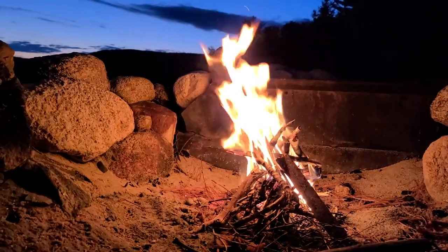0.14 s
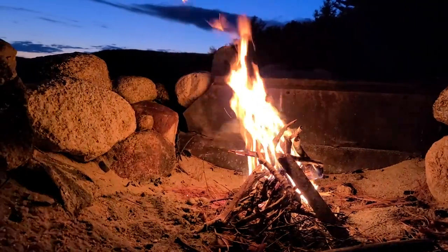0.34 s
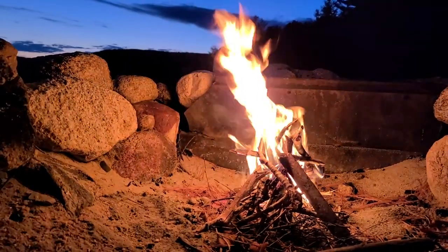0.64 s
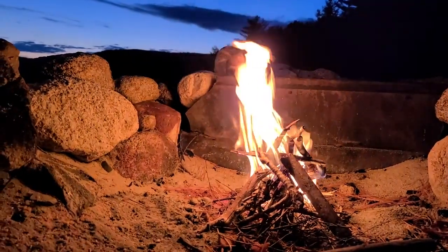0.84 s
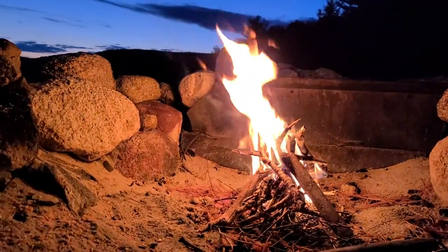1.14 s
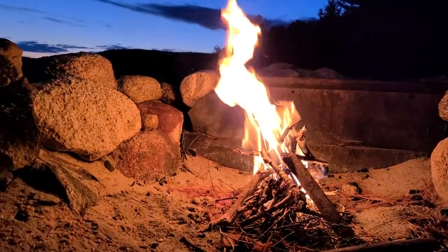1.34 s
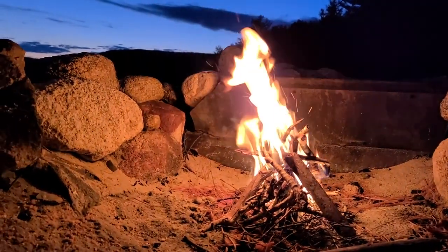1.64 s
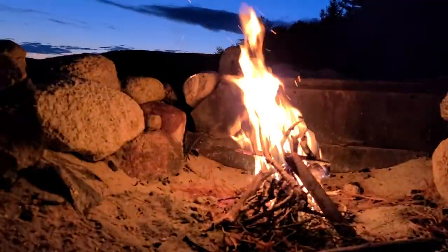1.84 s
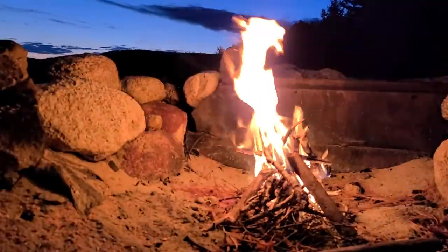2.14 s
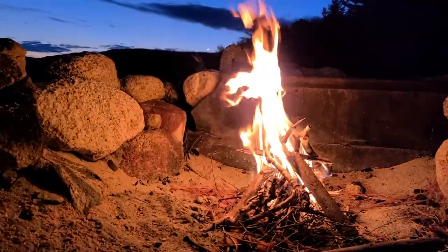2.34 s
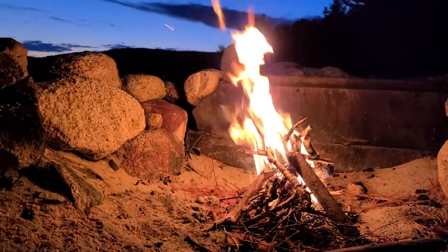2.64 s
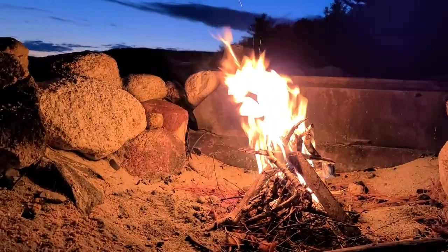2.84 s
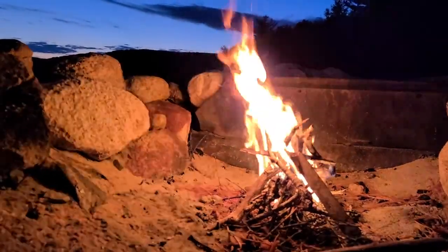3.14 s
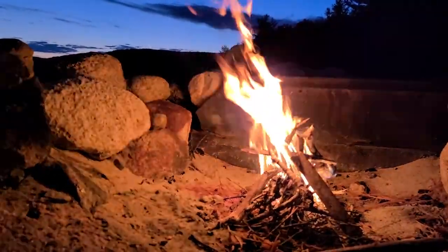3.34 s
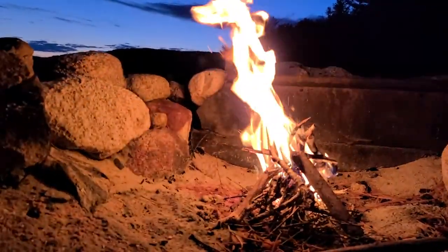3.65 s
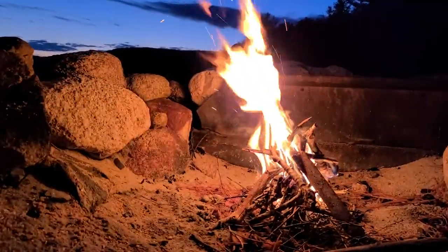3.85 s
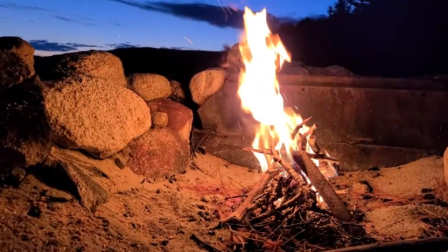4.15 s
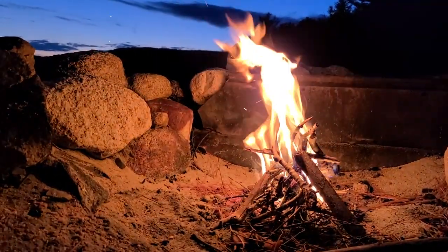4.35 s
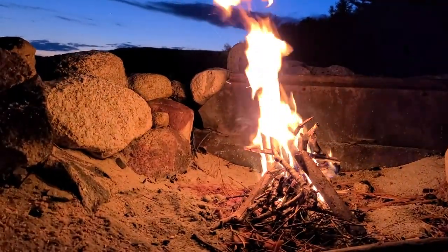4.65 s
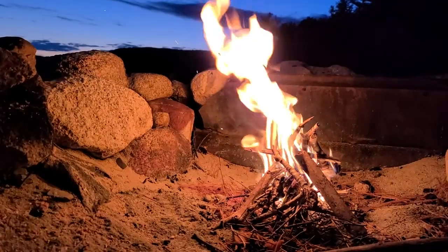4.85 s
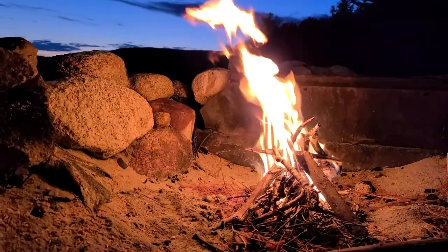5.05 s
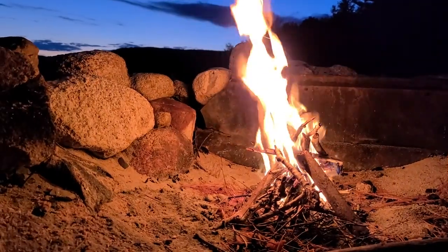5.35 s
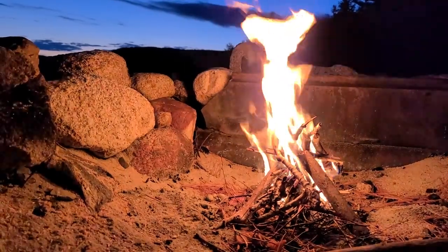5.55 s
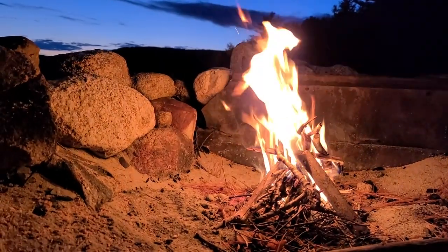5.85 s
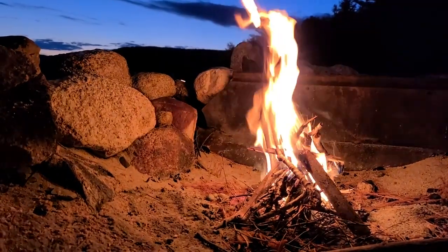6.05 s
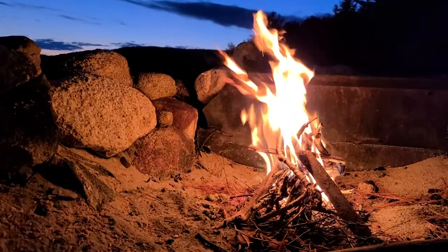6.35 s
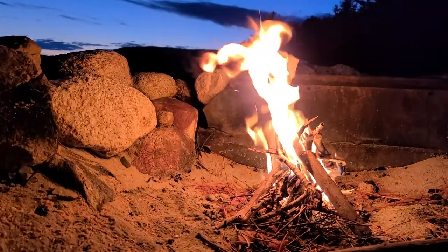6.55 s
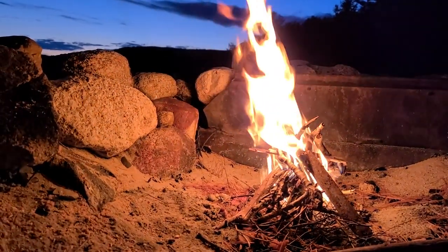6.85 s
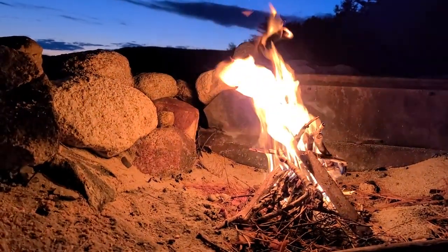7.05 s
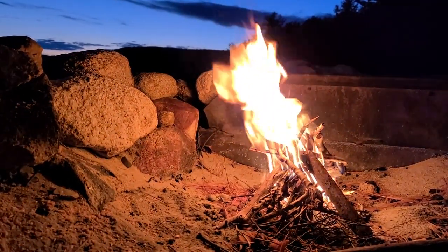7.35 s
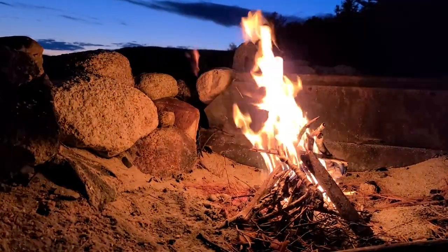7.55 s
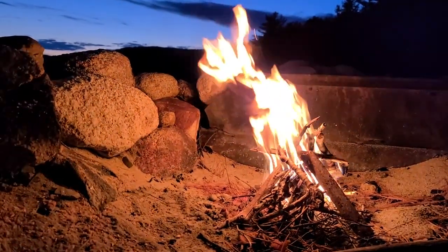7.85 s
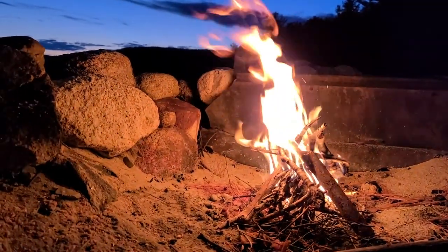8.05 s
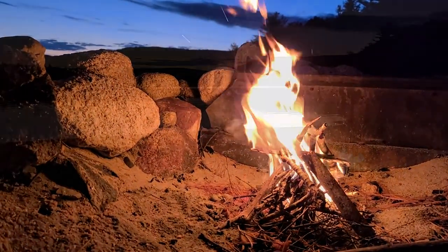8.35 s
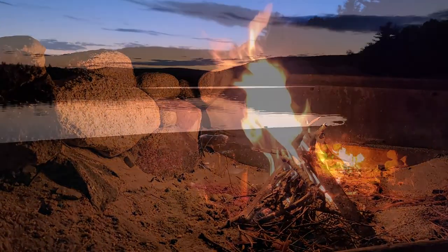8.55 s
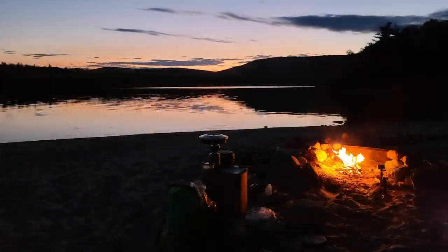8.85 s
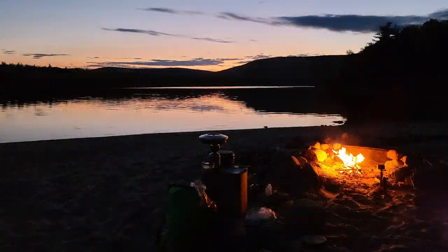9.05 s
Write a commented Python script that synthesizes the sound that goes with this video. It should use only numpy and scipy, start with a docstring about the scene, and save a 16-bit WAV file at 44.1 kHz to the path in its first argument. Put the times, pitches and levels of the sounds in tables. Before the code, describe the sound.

A small stick fire crackles close to the microphone, with sharp pops, a faint hiss and a soft low flutter of flame. Across a still lake a loon repeats short, wavering tremolo calls that echo off the far shores. About halfway through, a second, higher loon begins answering, often overlapping the first. A small bird whistles very faintly in the woods. Just before the end the fire cuts off, leaving a loon calling.

```python
"""A stick fire crackles close by, over the dying echo of a loon's call. Bursts of sap ring the sticks,
sap hisses and the flame flutters low, until the fire is cut off near the end. Across a still lake at dusk
two loons trade tremolo calls: harmonic tones that warble in pitch and level and jump between registers.
The far shores hand every note back late and long. Faint air lies over the water, and a small bird
whistles far off in the woods."""
import sys
import numpy as np
from scipy import signal
from scipy.fft import rfft, irfft
from scipy.io import wavfile
from scipy.ndimage import uniform_filter1d

SR = 44100
rng = np.random.default_rng(int(sys.argv[2]) if len(sys.argv) > 2 else 0)


def master(y):
    """Save y as 16-bit WAV."""
    cut = np.clip(np.atleast_2d(y).T, -1, 1)
    pcm = np.round(cut * 32767)  # scale
    wavfile.write(sys.argv[1], SR, pcm.astype(np.int16))


N = 405719
FIRE_END_S = 8.84


def undb(db):
    """Decibels to amplitude gain."""
    return 10 ** (np.asarray(db) / 20)


def band(x, hz, width_hz):
    """A second-order resonance with unit gain at its centre."""
    return signal.lfilter(*signal.iirpeak(hz, hz / width_hz, fs=SR), x)


def walk(rate):
    """Slow random modulation: levels held 1 / rate seconds and smoothed twice, with a spread near 1."""
    hold = int(SR / rate)
    steps = np.repeat(rng.standard_normal(N // hold + 1), hold)
    return 1.363 * uniform_filter1d(uniform_filter1d(steps, hold), hold)[:N]


def noise(spectrum, lo_hz=0., hi_hz=SR):
    """Spectral shaping: two independent coloured noises, of rms 1 before the band lo-hi is selected."""
    f = np.fft.rfftfreq(N, 1 / SR) + 1
    hz, db = np.transpose(spectrum)
    gain = undb(np.interp(np.log(f), np.log(hz), db, -70, -70))
    passband = np.sqrt(1 / (1 + (f / hi_hz) ** 8) - 1 / (1 + (f / (lo_hz + 1e-9)) ** 8) + 1e-12)
    return irfft(rfft(rng.standard_normal((2, N))) * gain * passband, N) / np.sqrt(np.mean(gain ** 2))


def sap_burst(rise_ms, knock_db, thump_db, span):
    """Impulse excitation: bursting sap rings a stick's resonances, with a knock and a puff of air."""
    # Each row: resonance in Hz, bandwidth in Hz, gain in dB.
    stick_modes = [(5600, 630, -1.5), (8530, 4200, -4.5), (11080, 1800, 4), (14500, 2200, -17.5)]
    t = np.arange(span) / SR
    rise_s = rise_ms / 1000
    left, other = rng.standard_normal((2, span))
    right = 0.27 * np.roll(left, 1) + 0.74 * other  # the shared part reaches the right a little later
    envelope = t / rise_s * np.exp(1 - t / rise_s) + undb(-22) * np.exp(-t / .004)
    burst = np.array([left, right]) * envelope
    ring = sum(undb(db) * band(burst, hz, width) for hz, width, db in stick_modes)
    knock = band(burst[0] + 0.2 * burst, hz=820, width_hz=2000)
    thump = np.sin(2 * np.pi * 150 * t) * np.exp(-t / 0.0089)
    return ring / abs(ring).max() + undb(knock_db) * knock / abs(knock).max() + undb(thump_db) * thump


def crackle(ticks_per_s=27, follow_share=.4, follow_s=0.018, ceiling=.55, span=2048):
    """A clustered random process of faint ticks, some hard on the heels of another, under louder pops."""
    # Each row: start in seconds, level in dB, left minus right in dB, relative knock level in dB.
    loud_pops = [(0.15, -43, 1.0, -10), (0.161, -34.5, 4.5, -5), (0.3003, -37.5, 3, -10),
                 (0.4484, -42, 7, -12), (0.516, -34, 3, -6), (0.6565, -38, 6, -9), (0.6739, -33, 3.5, -10),
                 (0.8176, -17.5, 8, 1.5), (0.9123, -34, 2, -8), (1.272, -26.5, 6, -4.5),
                 (1.5254, -32, 2.5, -8), (1.5278, -20.5, 4, -5), (1.6004, -33, 3.0, -6),
                 (1.6116, -22.5, 3, -9), (1.942, -35.5, 7, -12), (1.9982, -42, 8, -16),
                 (2.254, -26.5, 4, -11.5), (2.306, -37.5, 2, -13), (2.3486, -35.5, 2, -10),
                 (2.5343, -34, 5.5, -10), (2.6736, -18.5, 1.5, -14), (2.9188, -46, 4.5, -10),
                 (3.1657, -38, 2.0, -12), (3.1832, -20, 3, -6.5), (3.3209, -46, 3.0, -10),
                 (3.47, -37, 5.5, -8), (3.5014, -6, 4.5, -7.5), (3.6037, -43.5, 2.0, -10),
                 (3.682, -42, 6, -7.5), (3.9538, -18, 4.5, -5.5), (4.3535, -23, 4.5, -11),
                 (4.3867, -20, -1, -21), (4.474, -25.5, 3, -9.5), (4.813, -38, 4.5, -10),
                 (4.8514, -31, 0.0, -13), (4.9836, -23.5, 4.5, -3.5), (5.5199, -39.5, 1, -6),
                 (5.9239, -43, 0.0, -12), (5.9609, -14.5, 4, -11), (6.0196, -17, 7.0, -9.5),
                 (6.0484, -25, 0, -7), (6.2464, -18.5, 6, -12), (6.301, -26, 5, -13), (6.5301, -37, 4, -10),
                 (6.6923, -37, 2, -10), (6.764, -37, 6.5, -10), (6.781, -35, 2.5, -8),
                 (6.8611, -30, -0.5, -13), (7.1531, -31.5, 4, -14), (7.4767, -39, 4, -9),
                 (7.518, -38.5, -2, -10), (7.6434, -37, 5, -10), (7.6757, -31, 2, -14),
                 (7.9901, -37.5, 6, -16), (8.0395, -45.5, 4.0, -10), (8.105, -46, 3, -12),
                 (8.2686, -29, 5, -13), (8.3247, -33, 3.0, -11), (8.6527, -42.5, 5.0, -11),
                 (8.6906, -40, 2.5, -4), (8.8193, -41, 3, -11)]
    when, size, pan, follow, lag = rng.random((int(ticks_per_s * FIRE_END_S), 5)).T
    starts = when * FIRE_END_S
    starts = np.where(follow < follow_share, np.roll(starts, 1) + lag * follow_s, starts)
    ticks = [(*row, -16, -40, .4) for row in zip(starts, -54.5 - 4.1 * np.log(size), 6 * pan - 1)]
    pops = [(*row, -23, 1 + 0.29 * (rng.random() - .5)) for row in loud_pops]
    out = np.zeros((2, N + span))
    for start, db, pan_db, knock_db, thump_db, rise_ms in ticks + pops:
        at = int(start * SR)
        gains = undb(db + np.array([[pan_db], [-pan_db]]) / 2)
        out[:, at:at + span] += gains * sap_burst(rise_ms, knock_db, thump_db, span)
    return ceiling * np.tanh(out[:, :N] / ceiling)  # the microphone rounds the loudest pop


def flame():
    """Amplitude-modulated low noise: the flame flaps in all octaves at once and flickers in each."""
    # Each row: frequency in Hz, relative spectral density in dB.
    spectrum = [(25, -9), (50, -3.5), (110, -1), (190, -3.5), (300, -16.5), (450, -36), (900, -14)]
    # Each row: time in seconds, level in dB before the flutter.
    levels = [(0.0, -53.5), (1.79, -56.5), (3.92, -52), (3.95, -37), (4.04, -55), (5.59, -51.5),
              (6.96, -59.5), (7.06, -44), (7.16, -55), (8.8, -51)]
    gust, out = walk(22), 0
    for lo_hz in 20 * 2. ** np.arange(6):
        mid, side = noise(spectrum, lo_hz, 2 * lo_hz)
        flutter = undb(3.9 * gust + 0.97 * walk(18))
        out = out + flutter * (mid + .07 * side * np.array([[1], [-1]]))
    return out * undb(np.interp(np.arange(N) / SR, *np.transpose(levels)))


def sap_hiss():
    """Broadband noise: the sap hisses in the high treble, its level drifting and flickering."""
    # Each row: frequency in Hz, relative spectral density in dB.
    spectrum = [(1500, -14.5), (3000, -16.5), (6000, -10), (9000, -9.5), (11500, 0), (13500, -6),
                (15800, -13.5)]
    return undb(-69.5 + 2.3 * walk(1) + 2.2 * walk(60)) * noise(spectrum)


def lake_response(build_s=0.24):
    """Reflection and reverberation: a water bounce, shore echoes, then a wash that swells and decays."""
    # Each row: delay of a wooded shore in seconds, level in dB, spread in seconds.
    shores = [(0.168, -30, 0.012), (0.299, -22, .05), (.5, -34.5, 0.15)]
    # Each row: band centre in Hz, time to decay by 60 dB in seconds, relative level in dB.
    wash_bands = [(543, 0.73, -13), (1070, 2.92, -21.5), (2440, 3.4, -42), (5070, 0.95, -16)]
    t = np.arange(3 * SR) / SR
    grain = rng.standard_normal(len(t))
    bounce = undb(-18) * 1000 ** (-t / .08) / np.sqrt(.006 * SR)
    echoes = sum(undb(db) * np.exp(-.5 * ((t - delay) / spread) ** 2) / np.sqrt(spread * SR)
                 for delay, db, spread in shores)
    wash = sum(undb(db) * band(grain, hz, 1.27 * hz) * 1000 ** (-t / t60) for hz, t60, db in wash_bands)
    wash *= (1 - np.exp(-t / build_s)) * undb(-30.5)
    return band(grain, hz=1300, width_hz=8200) * (bounce + echoes) + wash


def lake_air():
    """Stationary noise: faint, dark air over the water."""
    # Each row: frequency in Hz, relative spectral density in dB.
    spectrum = [(25, -0.5), (100, 0), (200, -7), (350, -7), (600, 0), (1500, -9.5), (3000, -18)]
    return undb(-73.5) * noise(spectrum)[0]


def warble(t, note, slowing_s, dip_at, roundness, db_per_dip, bend_s=.13):
    """Coupled frequency and amplitude modulation: a slowing train of crests, softer in the dips between."""
    start, end, crest, period, hz, dip, bend, db, swell_db = note[:9]
    periods = period + slowing_s * np.arange(9)
    crests = crest + np.cumsum(periods) - periods
    first_dip = min(start, crest - (1 - dip_at) * period)
    turns = np.r_[first_dip, np.c_[crests, crests + dip_at * periods].ravel()]  # dip, crest, dip, ..
    last = np.searchsorted(turns, end) - 1
    if last % 2 == 0 and last > 0 and end - turns[last] < .65 * (turns[last + 1] - turns[last]):
        turns[last] = end  # the closing dip lasts to the end of the note
    height = np.sin(np.pi / 2 * np.interp(t, turns, np.arange(len(turns)) % 2))
    drop = dip * (1 - (1 - roundness) * height - roundness * height ** 2)
    late = lambda at: np.exp((at - end) / bend_s)  # bend and swell gather toward the end
    glide = (late(t) - late(crest)) / (1 - late(start))
    dip_db = db_per_dip * drop
    return hz * (1 + bend * glide) * (1 - drop), db + swell_db * glide - dip_db, dip_db


def loon(notes, registers, style, buzzing, edge_s, rough_db, shore_share, shore_db):
    """Source and filter: six harmonics pass the throat. Returns the sound sent here and to the shores."""
    # Each row: throat resonance in Hz, bandwidth in Hz, lift in dB.
    throat = [(3690, 280, 8.5), (4840, 600, 10)]
    # The buzzing bird turns its head from call to call.
    # Each row: time in seconds, lift of partial 2 in dB, lift of higher partials in dB, buzz in dB.
    facing = np.array([(.8, 4, 3, -30.5), (1.18, 4, 7, -35), (2.4, 0, 1, -36), (2.8, -1, 3.5, -31),
                       (4.0, 6.5, -4, -23.5), (5.5, 1, 3, -31.5), (7.2, -1, -3.5, -32.5),
                       (8.8, 1.5, -7.5, -34.5)])
    # Each row, one per partial: lower sideband over the buzz in dB, upper over lower sideband in dB.
    sidebands = [(-7, 3.5), (15, -29.5), (3, -1.5), (18.5, -1.5), (13.5, -1), (13.5, 1.5)]
    out, registers, flutter_db = np.zeros((2, N)), np.array(registers, float), rough_db * walk(150)
    for note in notes:
        start, end = note[:2]
        at = np.arange(int(start * SR), min(int(end * SR), N))
        t = at / SR
        hz, db, dip_db = warble(t, note, **style)
        phase = 2 * np.pi * (np.cumsum(hz) / SR + rng.random())
        register = registers[np.argmin(abs(registers[:, 0] - np.median(hz))), 1:]
        if buzzing:  # the buzz grows in the dips and at both ends of a note
            second_db, upper_db, buzz_db = (np.interp(t, facing[:, 0], col) for col in facing.T[1:])
            buzz_db += .5 * dip_db + 10 * np.exp((start - t) / .08) + 22 * np.exp((t - end) / .08)
        else:  # partials above the second hold up through fades, and through dips until the note ends
            crest_db, lift_db = note[7], note[9]
            second_db = np.full(len(t), .6 * lift_db - 3)
            upper_db = lift_db + 1.15 * (crest_db - db - dip_db)
            upper_db += dip_db * (1 - np.exp((t - end) / 0.017))
        tone = np.zeros((2, len(t)))
        for n, partial_db in enumerate(register, 1):
            throat_db = sum(lift / (1 + (2 * (n * hz - centre) / width) ** 2)
                            for centre, width, lift in throat)
            source_db = partial_db + n * flutter_db[at] + throat_db  # higher partials are rougher
            wave = np.sin(n * phase)
            if buzzing:
                source_db += .45 * (n - 1) * (db - db.max())  # soft moments are duller
                if np.median(hz) > 950:  # top register: every fourth cycle is stronger, giving sidebands
                    lower_db, tilt_db = sidebands[n - 1]
                    buzz = np.sin((n - .25) * phase) + undb(tilt_db) * np.sin((n + .25) * phase)
                    wave += undb(np.minimum(buzz_db + lower_db, 0)) * buzz
            # overtones beam out of the bill; the shores all round hear them more evenly
            beam_db = np.zeros(len(t)) if n == 1 else second_db if n == 2 else upper_db
            around_db = shore_share * beam_db + shore_db * (n > 2)
            tone += undb(source_db + np.array([beam_db, around_db])) * wave
        edge = np.clip(np.minimum(t - start, end - t) / edge_s, 0, 1)
        out[:, at] += np.sqrt(2) * undb(db) * edge * tone
    return out


def first_loon():
    """Register jumps with subharmonics: the lower voice buzzes on its top notes."""
    # Each row: start, end, first crest and warble period in seconds, crest pitch in Hz,
    # dip and bend as shares of the pitch, crest level in dB, swell in dB.
    notes = [ (.42, .475, .49, 0.12, 616, 0.32, 0.039, -44, -8.5),
             (.503, .6, .561, .12, 893.7, 0.21, 0.02, -34.5, -5),
             (.597, 1.125, .661, .1022, 1217, .178, -.056, -18, -2),
             (1.12, 1.24, 1.184, .11, 809, .15, -0.056, -38.5, -0.5),
             (2.035, 2.07, 2.074, 0.084, 621, 0.3, 0.0069, -40, -8),
             (2.068, 2.108, 2.066, .09, 795, .14, 0, -42.5, 6.5),
             (2.108, 2.195, 2.18, .15, 939, .26, .05, -37.5, -15.5),
             (2.193, 2.737, 2.266, .1008, 1218, .178, -.058, -18, -1.5),
             (2.735, 2.85, 2.781, .11, 882, .21, -.1, -36.5, 2),
             (3.55, 3.61, 3.594, 0.085, 556, 0.079, 0.004, -52.5, -8.5),
             (3.625, 3.76, 3.66, 0.096, 850, .18, 0.13, -35.5, 1.5),
             (3.755, 4.325, 3.762, .102, 1228, .17, -0.081, -19, -6),
             (4.32, 4.375, 4.29, .12, 773, 0.24, -0.018, -41.5, 7),
             (5.21, 5.3, 5.254, 0.095, 849, .12, 0, -35.5, 1),
             (5.3, 5.915, 5.354, 0.097, 1213, 0.17, -0.065, -18.5, -3),
             (5.915, 6.015, 5.92, .3, 719, 0.055, -0.018, -46, 5),
             (6.76, 6.8, 6.805, 0.093, 611, 0.29, 0.016, -43, -11.5),
             (6.805, 6.905, 6.89, .14, 981, .3, 0.044, -36, -13),
             (6.905, 7.53, 6.972, 0.097, 1213, 0.17, -.07, -17.5, -6.5),
             (7.53, 7.59, 7.52, 0.15, 700, 0.066, 0.01, -35, -7.5),
             (8.53, 8.628, 8.58, 0.099, 868, 0.15, 0.055, -34.5, 3),
             (8.63, 9.15, 8.68, 0.098, 1221, .165, -0.059, -18, -6),
             (9.15, 9.2, 9.203, 0.11, 880, 0.17, -0.0038, -31, 0.5)]
    # Each row: pitch of a register in Hz, then relative levels of partials 1 to 6 in dB.
    registers = [(540, -9, 4, -9.5, -25, -43.5, -58.5), (850, 4.5, 3, -21.5, -25, -31, -36),
                 (1150, 1, -24, -38, -56.5, -72, -80.5)]
    style = dict(slowing_s=.001, dip_at=.47, roundness=0.4002, db_per_dip=66)
    return loon(notes, registers, style, buzzing=True, edge_s=0.0081, rough_db=1.34,
                shore_share=0.32, shore_db=4.5)


def small_bird(woods_t60_s=1.0):
    """Scattering: short pure whistles flicker over a long path and are smeared by the woods."""
    # Each row: start in seconds, length in seconds, pitch in Hz, level in dB before the flicker.
    whistles = [(3.365, 0.031, 2830, -73.5), (3.41, 0.032, 2700, -67.5), (3.46, 0.054, 2910, -66.5),
                (6.535, 0.021, 2518, -57.5), (6.555, 0.021, 2540, -61.5), (6.556, 0.032, 2954, -61.5),
                (6.588, 0.014, 2418, -55), (6.593, 0.044, 2823, -60.5), (6.613, 0.049, 3063, -60.5)]
    out = np.zeros(N)
    for start, length, hz, db in whistles:
        at, t = int(start * SR), np.arange(int(length * SR)) / SR
        out[at:at + len(t)] += undb(db) * np.sin(np.pi * t / length) ** .6 * np.sin(2 * np.pi * hz * t)
    out *= undb(5.5 * walk(90))
    woods = rng.standard_normal(SR) * 1000 ** (-np.arange(SR) / SR / woods_t60_s)
    return out + undb(-5) * signal.fftconvolve(out, woods / np.linalg.norm(woods))[:N]


def second_loon():
    """Register jumps in a purely harmonic voice: the answer is higher and smoother."""
    # Each row: the columns of the first loon's notes, then the lift of the overtones in dB.
    notes = [ (4.39, 4.425, 4.425, 0.087, 899, 0.023, 0.17, -31.5, 0, 2),
             (4.425, 4.535, 4.42, 0.1, 1216, 0.15, 0.052, -22, 7, 2.5),
             (4.535, 4.912, 4.531, 0.092, 1459, .23, -.2, -12.5, -11, -8),
             (5.63, 5.665, 5.665, .1, 822.5, 0.018, 0.11, -38.5, -7, -5),
             (5.665, 5.735, 5.662, 0.08, 1060, 0.19, 0.12, -21, 10, 3.5),
             (5.735, 5.957, 5.75, 0.093, 1347, 0.17, 0.05, -14.5, -3, -2.5),
             (5.958, 6.0, 5.955, .092, 1686, 0.16, 0, -28, -10.5, 6.5),
             (6.015, 6.21, 6.055, 0.11, 1305, .15, -0.21, -18.5, -16, 0),
             (6.88, 6.915, 6.915, .1, 780, .02, 0.14, -32, 3.5, -11),
             (6.915, 6.98, 6.91, 0.08, 1000, 0.18, .15, -21, 10.5, -6),
             (6.98, 7.2, 6.998, .097, 1311, .155, .1, -13.5, -2.5, -21),
             (7.2, 7.46, 7.2, 0.1, 1667, 0.14, -0.038, -27.5, -24, -20),
             (8.17, 8.2, 8.2, 0.12, 759.7, 0.018, 0.12, -29.5, 10.5, -7.5),
             (8.2, 8.285, 8.2, .095, 1012, 0.16, 0.085, -19.5, 5, -6.5),
             (8.285, 8.69, 8.305, 0.096, 1335, .17, -.1, -15.5, -6.5, -15)]
    # Each row: pitch of a register in Hz, then relative levels of partials 1 to 6 in dB.
    registers = [(780, -5, 5, -35, -34.5, -31, -42), (1000, -1, -27.5, -33, -38, -49, -55.5),
                 (1280, -0.5, -32, -31, -35.5, -49.5, -50.5), (1600, 4, -14, -22, -31, -57.5, -73.5)]
    style = dict(slowing_s=.007, dip_at=.49, roundness=.76, db_per_dip=75)
    return loon(notes, registers, style, buzzing=False, edge_s=0.0051, rough_db=0.9,
                shore_share=0.19, shore_db=-2.0)


def scene():
    """Superposition: distant birds and their echoes, a touch left, and the fire at hand."""
    first, first_to_shore = first_loon()
    second, second_to_shore = second_loon()
    bird, air = small_bird(), lake_air()
    lead = int(1.83 * SR)  # the opening call also sounds this much earlier; only its echo is heard
    earlier_call = undb(6) * first_to_shore[:lead]
    calls = np.r_[earlier_call, first_to_shore + second_to_shore + undb(13.5) * bird]
    echo = signal.fftconvolve(calls, lake_response())[lead:lead + N]
    distant = (first + second + bird + air + echo) * undb([[.2], [-.2]])
    fire_gate = np.clip((FIRE_END_S - np.arange(N) / SR) / .004, 0, 1)
    return distant + (crackle() + flame() + sap_hiss()) * fire_gate


def record(dry, top_hz=16600):
    """Band limiting: the recorder's steep low-pass filter removes the highest treble."""
    return signal.sosfilt(signal.ellip(8, .2, 70, top_hz, fs=SR, output="sos"), dry)


dry = scene()
out = record(dry)
master(out)
```